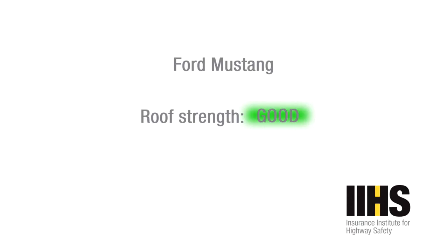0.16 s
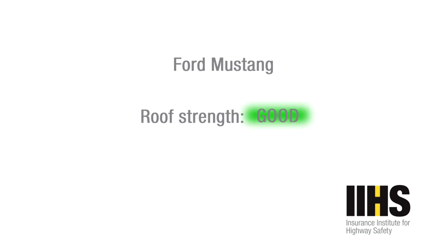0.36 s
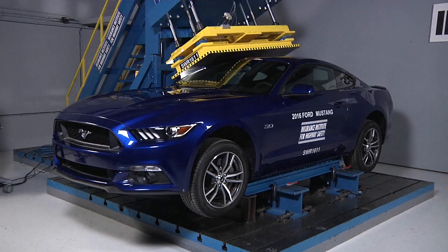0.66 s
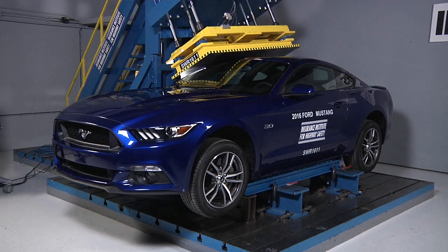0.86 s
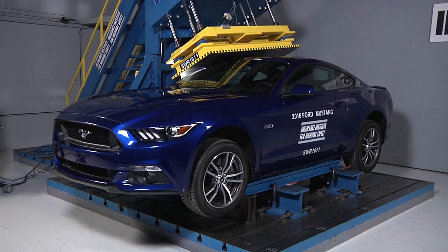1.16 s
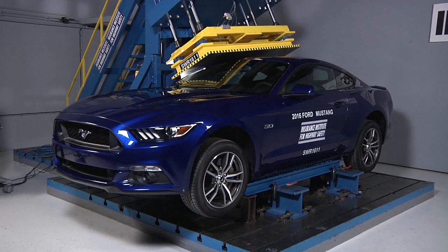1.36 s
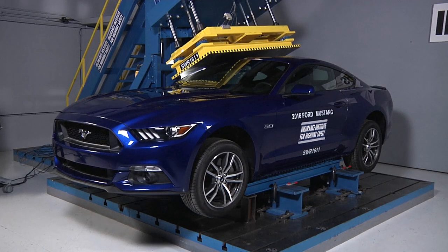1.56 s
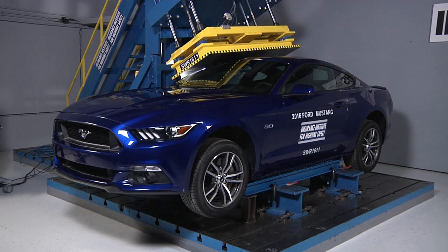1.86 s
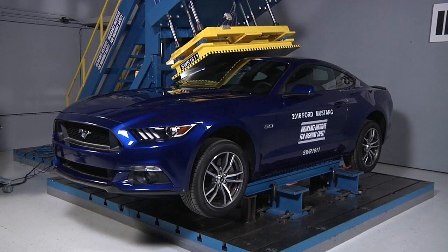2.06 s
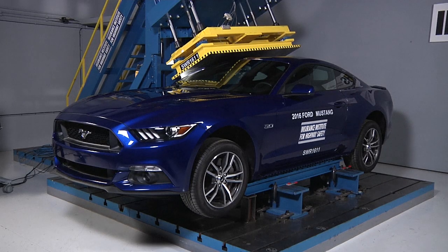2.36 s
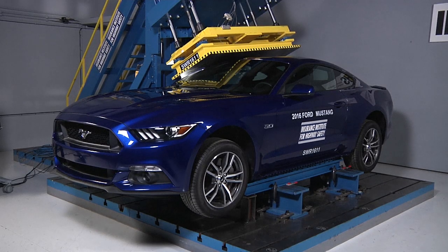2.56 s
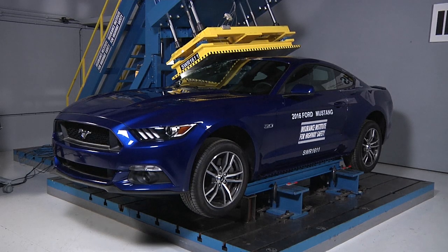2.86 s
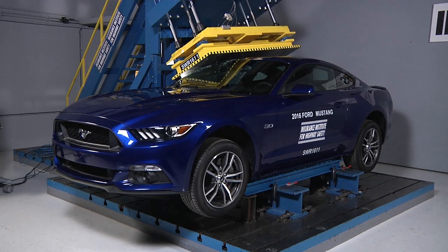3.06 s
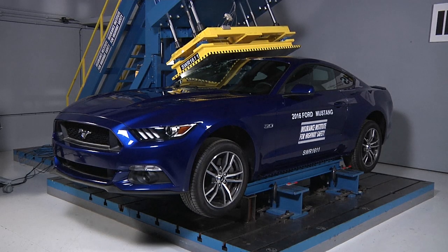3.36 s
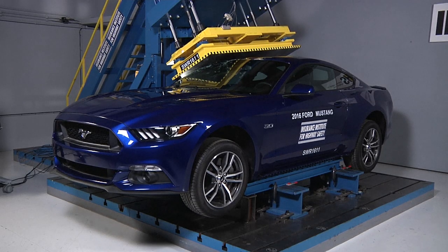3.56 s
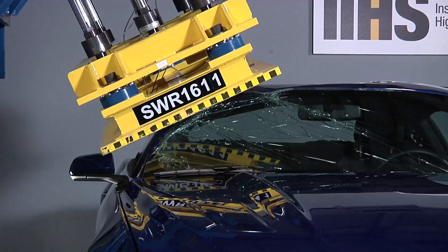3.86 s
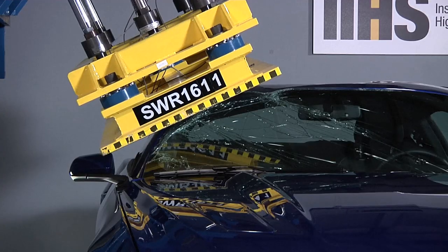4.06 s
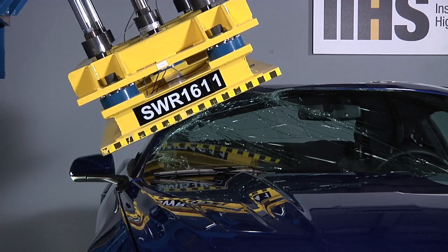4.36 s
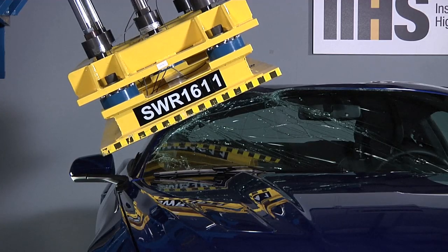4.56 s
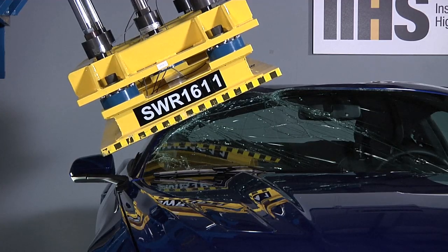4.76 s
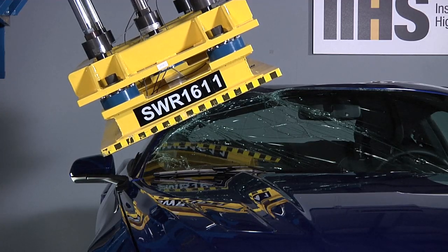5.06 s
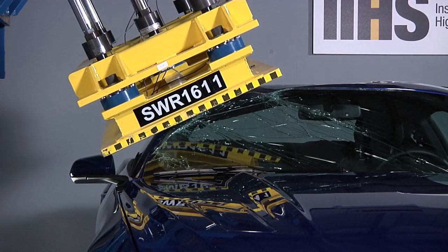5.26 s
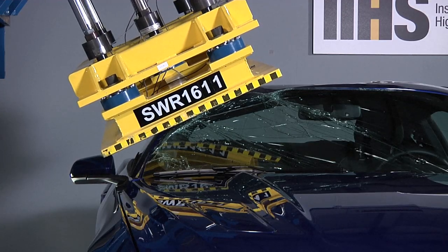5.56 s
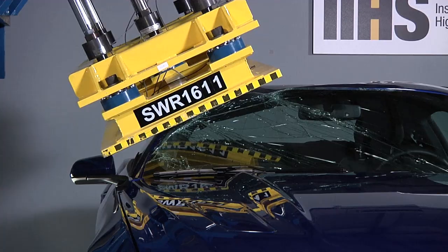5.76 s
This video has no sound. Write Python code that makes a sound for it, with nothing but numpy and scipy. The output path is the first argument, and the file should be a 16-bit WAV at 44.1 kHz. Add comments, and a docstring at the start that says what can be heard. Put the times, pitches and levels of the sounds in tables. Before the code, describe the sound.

After brief silence, glass snaps and car panels knock and creak under a slow press, over a faint hum in a hard-walled hall.

```python
"""Glass snaps and panels knock and creak as a hydraulic plate slowly crushes a car roof in a hard-walled hall.
Each break is a cluster of rough grains that rings the roof frame, panels and glass and is sent into the hall.
Small glass crackle thickens after large breaks, over the hum and motor tones of the press. Silence comes first,
then a wide view leaning left, then a close view far to the right; hiss and thin tones keep out of the lean."""
import sys
import numpy as np
from scipy import signal
from scipy.fft import rfft, irfft, next_fast_len
from scipy.io import wavfile

SR = 44100
rng = np.random.default_rng(int(sys.argv[2]) if len(sys.argv) > 2 else 0)


def natural_amplitude(level_db):
    """Convert a level in decibels to a linear amplitude factor, elementwise."""
    exponent = np.asarray(level_db, float) / 20
    return 10 ** exponent


def store_wav(level_fs):
    """Save 16-bit WAV to argv[1]."""
    pcm = np.round(np.clip(np.atleast_2d(level_fs), -1, 1) * 32767)
    wavfile.write(sys.argv[1], SR, pcm.T.astype(np.int16))


N = 261072

# the two listening views: start_s, end_s, left_minus_right_db
VIEWS = [(.522, 3.727, 7), (3.727, 6, -20.5)]
# resonances of the glass: centre_hz, width_hz, level_db
GLASS_MODES = [(5300, 1280, -1), (6770, 1080, 1.5), (8060, 2100, -2), (10240, 6200, -2)]


def evened(x):
    """Scales to rms 1."""
    return x / np.sqrt(np.mean(x ** 2) + 1e-20)


def read(points, hz):
    """Reads a spectrum table on a log-frequency axis."""
    f, value = np.transpose(points)
    return np.interp(np.log(hz + 1), np.log(f + 1), value)


def add(mix, s, sound):
    """Mixes a sound in at time s."""
    part = mix[round(s * SR):][:len(sound)]
    part += sound[:len(part)]


def ring(modes):
    """Click response of damped resonances in alternating sign, energy 1."""
    t = np.arange(4096) / SR
    out = np.zeros(len(t))
    for k, (hz, width_hz, db) in enumerate(modes):
        decay = np.sqrt(width_hz) * np.exp(-np.pi * width_hz * t)
        out += (-1) ** k * natural_amplitude(db) * decay * np.sin(2 * np.pi * hz * t)
    return out / np.linalg.norm(out)


def burst(ms, size=8192):
    """A rough break: a cluster of uneven grains that rises fast and dies over its length."""
    u = np.arange(size) / SR * 1000 / max(ms, .1)  # time in break lengths
    grains = natural_amplitude(4.37 * np.repeat(rng.standard_normal(size // 32), 32))
    envelope = (1 - np.exp(-max(5.0, ms / 3) * u)) * np.exp(-u)
    cluster = grains * rng.standard_normal(size) * envelope
    cluster[30] += 5.4 / max(ms, .5) ** 1.67  # brittle, short breaks open with one clean snap
    return cluster


def struck(drive, response):
    """Rings a part with the break, envelope peak 1; the second row is its hall send, a smoother blend."""
    sound = signal.fftconvolve(drive, response)
    sound /= abs(signal.hilbert(sound, next_fast_len(len(sound)))).max()
    smooth = np.linalg.norm(sound) * np.pad(response, (0, len(sound) - len(response)))
    return np.array([sound, .93 * smooth + .36 * sound])


def pair(first, second, hz):
    """Two spectra alike in the bass and looser in the treble."""
    # left-right likeness: frequency_hz, correlation
    likeness = [(100, 0.95), (600, 0.98), (1200, 0.93), (2600, 0.73), (6000, 0.16), (11000, 0.39)]
    same = np.clip(read(likeness, hz), -1, 1)
    return np.array([first, same * first + np.sqrt(1 - same ** 2) * second])


def noise(points, size):
    """Steady noise with the given spectrum."""
    white = rng.standard_normal(size)
    return irfft(rfft(white) * natural_amplitude(read(points, np.fft.rfftfreq(N, 1 / SR))), N)


def electronics():
    """Hiss, independent and equally loud on both sides, under steady thin sine tones."""
    # hiss spectrum: frequency_hz, density_db_per_hz
    hiss_colour = [(500, -13), (4000, 1), (11000, 4), (11480, -4), (11560, -22), (12500, -30)]
    # one entry a tone: frequency_hz
    whine_hz = [8000, 8393, 11752]
    # tone levels, rms before the band limit: left_db, right_db
    whine_db = [(-88, -89), (-95, -89), (-97, -99)]
    t = np.arange(N) / SR
    out = natural_amplitude(-76) * evened(noise(hiss_colour, (2, N)))
    for hz, (left_db, right_db) in zip(whine_hz, whine_db):
        tone = np.sqrt(2) * np.sin(2 * np.pi * hz * t)
        out += natural_amplitude(np.array([[left_db], [right_db]])) * tone
    return out


def press(view):
    """Broad hum of pump and fans with a few motor tones whose phase wanders."""
    # hum spectrum, one list a view: frequency_hz, density_db_per_hz
    hum_colours = [
        [(20, -14), (60, 10), (150, 6), (350, -1.5), (700, -3.5), (1400, -12), (3300, -20.5), (4800, -26),
         (8000, -42)],
        [(20, -7), (60, 3), (150, 1.5), (350, -14), (700, -7), (1400, -14.5), (3000, -20), (4800, -27.5),
         (8000, -31.5)],
    ]
    # hum level before the view's balance, one entry a view: rms_db
    hum_db = [-68, -64.5]
    # motor tones before the view's balance, one list a view: frequency_hz, rms_db, width_hz
    motor_tones = [
        [(151.4, -76, 25.3), (323, -78, 29.8), (543, -73, 4.5)],
        [(157, -74.5, 12.7), (274, -68, 23.13), (524, -80, 15)],
    ]
    broad = rfft(natural_amplitude(hum_db[view]) * evened(noise(hum_colours[view], (2, N))))
    hum = irfft(pair(*broad, np.fft.rfftfreq(N, 1 / SR)), N)
    for hz, db, width_hz in motor_tones[view]:
        wander = np.sqrt(2 * np.pi * width_hz / SR) * rng.standard_normal(N)
        hum += natural_amplitude(db) * np.sqrt(2) * np.sin(np.cumsum(2 * np.pi * hz / SR + wander))
    return hum


def hall():
    """Sparse taps whose bands die at their own speed, stronger at first, with a few blurred wall echoes."""
    # scattered returns from near walls: delay_s, level_db (re the tail)
    echoes = [(.010, -9), (.022, -10), (.04, -13.5), (0.06, -18)]
    # decay of the hall: frequency_hz, t60_s
    decay = [(60, 3.84), (250, 0.97), (600, 1.11), (1200, 1.78), (3000, 1.78), (6000, 1.6), (11000, 0.52)]
    # colour of the hall: frequency_hz, level_db
    colour = [(60, 2.5), (250, 4), (1000, 0.5), (3000, -4), (6000, -4), (11000, -6)]
    scatter_db, scatter_t60_s = 7, 0.18  # rig and car body fill the first moments
    size = 2 * SR
    taps = np.zeros((2, size))
    at = np.arange(160, size - 20, 20) + rng.integers(0, 20, (2, (size - 161) // 20))
    np.put_along_axis(taps, at, rng.choice([-1., 1.], at.shape), 1)
    taps *= 1 + natural_amplitude(scatter_db - 60 * np.arange(size) / SR / scatter_t60_s)
    hz, t, z = signal.stft(taps, SR, nperseg=256)
    z = z * natural_amplitude(read(colour, hz)[:, None] - 60 * t / read(decay, hz)[:, None])
    sides = pair(z[0].T, z[1].T, hz).transpose(0, 2, 1)
    tail = signal.istft(sides, SR, nperseg=256)[1]
    tail /= np.linalg.norm(tail[0])
    for s, db in echoes:
        blur = rng.standard_normal(200) * signal.windows.hann(200)
        start = round(s * SR)
        tail[:, start:start + len(blur)] += natural_amplitude(db) * blur / np.linalg.norm(blur)
    return tail


def crackle(near):
    """Fine glass splinters at random times, more and louder after each large break in near."""
    # softest splinter at rest before the balance, one entry a view: peak_db
    rest_db = [-70.5, -74]
    rest_per_s = 11
    strain = signal.lfilter([1 / 6000], [1, 1 / 6000 - 1], abs(near))  # smoothed loudness of the breaks
    busy = 1 + strain / natural_amplitude(-72.5)
    falls = rng.random(N) < busy * rest_per_s / SR
    size = natural_amplitude(3.8 * np.minimum(rng.exponential(1, N), 3)) * falls
    size *= np.sqrt(busy) * natural_amplitude(np.where(np.arange(N) < VIEWS[1][0] * SR, *rest_db))
    splinter = struck(burst(0.17), ring(GLASS_MODES))[0]
    return signal.oaconvolve(size, splinter)[:N]


def singing_parts(near, far):
    """A part sings in one band, a burst through a doubled resonance: creaks, squeaks, a clank, thuds, a boom."""
    # one-band notes, levels before the balance: start_s, peak_db, pitch_hz, width_hz, length_ms
    notes = [(.672, -51.5, 3450, 500, 80), (.83, -49, 3370, 500, 17), (1.757, -39.5, 323, 154, 22),
             (1.796, -38.5, 343, 197, 8.1), (2.476, -42, 1420, 600, 83), (2.73, -45.5, 36.5, 25, 48),
             (2.731, -31.5, 175, 150, 63), (2.797, -32.5, 1080, 262, 6.1), (3.28, -47.5, 3400, 900, 49),
             (3.872, -33, 1700, 1320, 19), (4.27, -40, 2860, 430, 10), (4.328, -52.5, 2820, 600, 29),
             (5.143, -31, 1222, 454, 13.4), (5.16, -50, 1212, 300, 380), (5.657, -56, 2800, 297, 40),
             (5.874, -28, 1270, 497, 9.9), (5.878, -38.5, 169, 150, 38)]
    for k, (s, db, hz, width_hz, ms) in enumerate(notes):
        resonance = ring([(hz, width_hz, 0)])
        note = signal.fftconvolve(resonance, resonance)[:4096]
        sound = natural_amplitude(db) * struck(burst(ms, size=49152), note / np.linalg.norm(note))
        add(near, s, sound[0])
        add(far[k % 3], s, natural_amplitude(-6.0) * sound[1])


def cracks(near, far):
    """Each break drives the frame (snap) and panels (thud), a slightly shorter one the glass (tick)."""
    # breaks, snap before the balance: time_s, snap_peak_db, thud_db (re snap), tick_db (re snap), hall_send_db
    breaks = [(0.5684, -46.5, -10, -1, -8.5), (0.6, -44.5, -1, -2, -9), (0.6103, -41, -26, -6, -3.5),
              (0.6235, -43, -5.5, -5, -3.5), (0.6364, -44.5, -0.5, 0.5, -8), (0.6748, -48, -14.5, -4, 2.5),
              (0.7257, -61, -9, 10, 4), (0.7504, -58, -10, -1.1, -9), (0.827, -45, -7.5, 2.5, -2.5),
              (0.845, -41, -13.5, -9, -14), (0.8706, -37, -4.5, -5, -6), (0.8757, -37.5, -16, -13, -14),
              (1.0702, -43.5, -6, 2, -5), (1.143, -47.5, -9.5, -1, -13), (1.2139, -41.5, -1.5, 5.5, -10),
              (1.4033, -28, -6.5, -5.5, -6), (1.4576, -43.5, -5, -6, -13),
              (1.7564, -31.5, -2.7, -0.7, -2.5), (1.7957, -36, -20, -5, -3.5), (1.8176, -41, -7, -12, -11),
              (1.9119, -43.5, -1, -5, -6), (1.9264, -46.5, 6.5, -10, -12), (1.9507, -36, 1, 0, -1),
              (1.9671, -32.5, -8, -23, -4.5), (2.2639, -51, -8, 1, -9), (2.4547, -38, -4, -10, -5),
              (2.4738, -27.5, -8.5, -11, -4.5), (2.6226, -30.5, -43, -9, -12),
              (2.6795, -37, -17, -12.5, -13), (2.694, -34, -15, -13, -6), (2.7197, -35.5, 0.5, 1, 5),
              (2.7275, -24, 2, -4, -4.5), (2.798, -30, 2, -3, -1.5), (2.9174, -47.5, -2, 3.5, -13),
              (2.9936, -49.5, -9, 6.5, -11), (3.1538, -46, -4, -2.5, 0), (3.1868, -52.5, -4, -2, 7),
              (3.28, -43.5, -3, 2, 0), (3.305, -48.5, -8, 4.5, 2.5), (3.376, -43.5, -10, -12.5, 0.5),
              (3.5003, -45, -3, 1.7, 3.5), (3.6033, -33, -3, -4.5, -2.5), (3.6611, -43.5, 1.5, 0.5, -5.5),
              (3.7428, -51.5, 0, -2, 2.5), (3.857, -61, -4, 6, -12), (3.8646, -36, -3, -26, -4),
              (3.8744, -34.5, 0.5, -27, -3), (3.8838, -35.5, -10.5, -18.5, 6.5),
              (4.2261, -43.5, -6, -11, -0.3), (4.2703, -33.5, -10, -14, -5.5),
              (4.3279, -46, -9, -3.5, -0.5), (4.6044, -65, 8, 12, -8), (4.8155, -48.5, -2.5, -18, 2.6),
              (4.928, -55.5, -24, -3, 1), (5.0745, -57, -0.5, -12, 10), (5.1405, -38.5, -1, -34, -2.2),
              (5.1564, -44.5, 2.3, -30, 0.3), (5.1714, -39.5, -1.5, -28, -0.5), (5.3594, -49, -6, -29, -6),
              (5.4032, -60, -16, 1, -16), (5.4946, -54, -14, -12, -4), (5.8716, -26, -4.5, -5.5, -7.5),
              (5.8795, -29, -6, -16, 4.2), (5.8944, -31.5, 3.5, -3.5, 0.5)]
    # resonances of the panels: centre_hz, width_hz, level_db
    panel_modes = [(128.5, 126, -3.5), (180, 134, -0.5), (323.6, 174, 1.5), (453.5, 217, 3),
                   (699, 440, -3.5)]
    # resonances of the roof frame before the tilt: centre_hz, width_hz, level_db
    frame_modes = [(1050, 750, -3.5), (1700, 640, 1.5), (2365, 1280, 1), (3400, 1090, 0),
                   (4040, 1500, -8.5)]
    # length of a break whose tick equals its snap, one entry a view: length_ms
    even_ms = [1.93, 3.3]
    brittle_db_per_db, longest_ms = -0.41, 8.8  # the glassier the break, the shorter it is
    panels = signal.lfilter(*signal.butter(2, 70, "high", fs=SR), ring(panel_modes))
    glass = ring(GLASS_MODES)
    for k, (s, db, thud_db, tick_db, hall_db) in enumerate(breaks):
        view = int(s > VIEWS[1][0])
        ms = min(even_ms[view] * natural_amplitude(brittle_db_per_db * tick_db), longest_ms)
        # dB per octave: glassy breaks ring the frame higher
        tilt_db = np.clip(0.34 * (tick_db - thud_db + 10.0), -2.2, 5.0)
        frame = ring([(hz, width_hz, level_db + tilt_db * np.log2(hz / 2000))
                      for hz, width_hz, level_db in frame_modes])
        drive = burst(ms)
        sound = struck(drive, frame) + natural_amplitude(thud_db) * struck(drive, panels)
        sound += natural_amplitude(tick_db) * struck(burst(0.85 * ms), glass)
        start_s = s - .0008  # early, as the clean snap sits a little inside the burst
        add(near, start_s, natural_amplitude(db) * sound[0])
        add(far[k % 3], start_s, natural_amplitude(db + hall_db) * sound[1])


def breaking():
    """Cracks, one-band notes and crackle: the direct sound, and three hall sends taken in turn."""
    near, far = np.zeros(N), np.zeros((3, N))
    cracks(near, far)
    singing_parts(near, far)
    return near + crackle(near), far


def scene():
    """Each view has its own stretch of time, press hum and balance; each hall send has its own tail."""
    near, far = breaking()
    t, out = np.arange(N) / SR, np.zeros((2, N))
    tails = [hall() for send in far]
    for view, (start, end, lean_db) in enumerate(VIEWS):
        on = np.clip(np.minimum(t - start, end - t) * 500 + .5, 0, 1)  # 2 ms fades
        wet = np.zeros((2, N))
        for send, tail in zip(far, tails):
            wet += signal.fftconvolve((send * on)[None], tail, axes=1)[:, :N]
        sound = near + wet + press(view)
        if lean_db < 0:
            sound = sound[::-1]  # a view to the right swaps the sides
        balance = np.array([[natural_amplitude(lean_db)], [1]]) * 2 / (1 + natural_amplitude(lean_db))
        out += on * sound * balance
    return out


def low_pass(x):
    """Removes everything above the highest recorded frequency."""
    return signal.sosfilt(signal.butter(12, 12500, fs=SR, output="sos"), x)


def record(dry):
    """Adds the hiss and thin tones from the first view on, then limits the band."""
    t = np.arange(N) / SR
    mix = dry + electronics() * (t > VIEWS[0][0])
    edge = signal.firwin(255, 11680, window=("kaiser", 5), fs=SR)  # low-pass, Hz
    mix = signal.oaconvolve(mix, edge[None], "same")
    return low_pass(mix)


dry = scene()
out = record(dry)
store_wav(out)
```